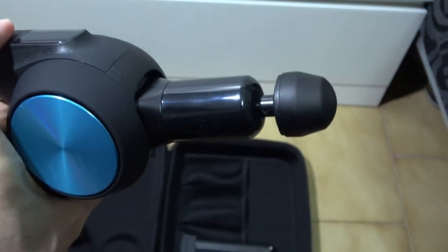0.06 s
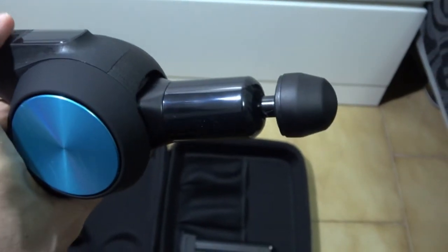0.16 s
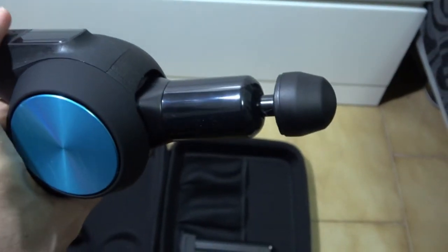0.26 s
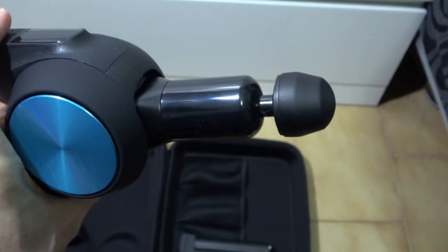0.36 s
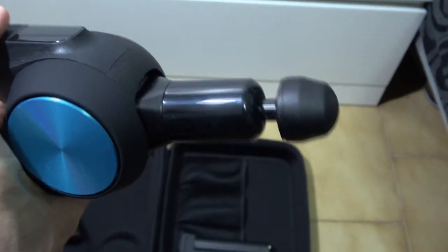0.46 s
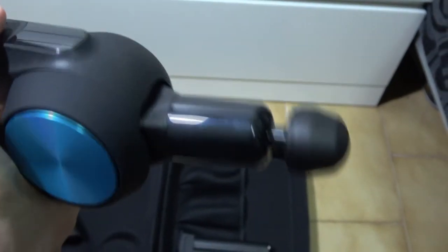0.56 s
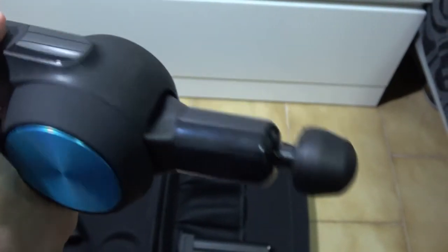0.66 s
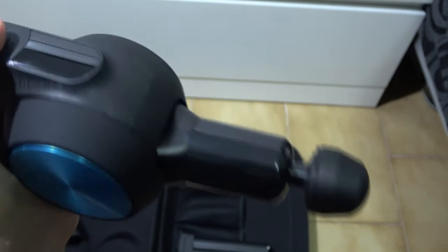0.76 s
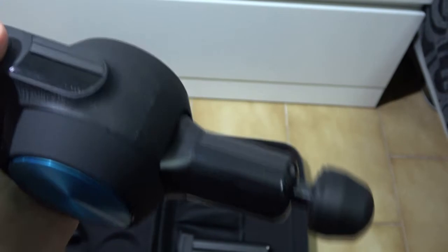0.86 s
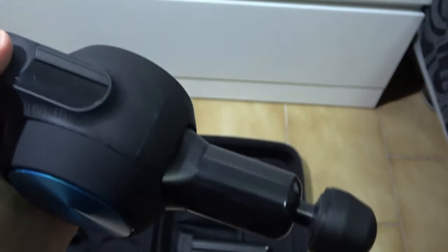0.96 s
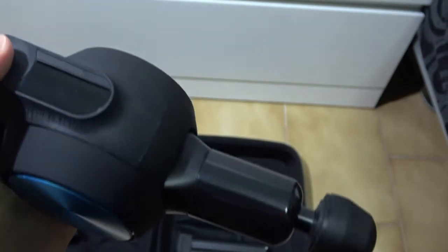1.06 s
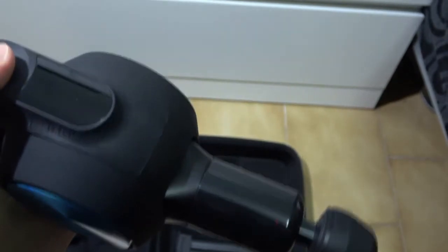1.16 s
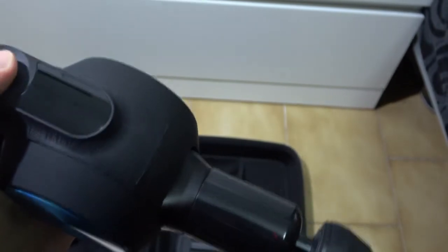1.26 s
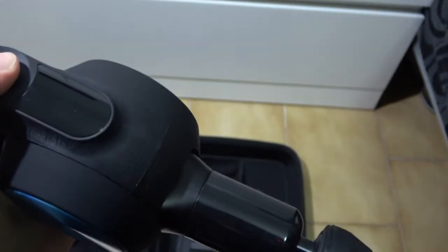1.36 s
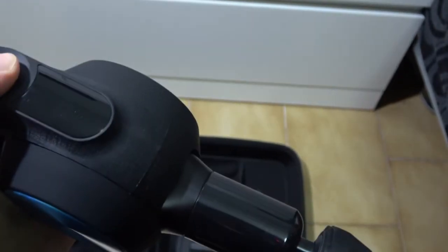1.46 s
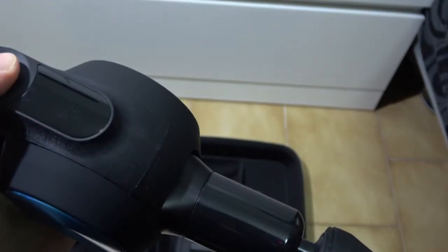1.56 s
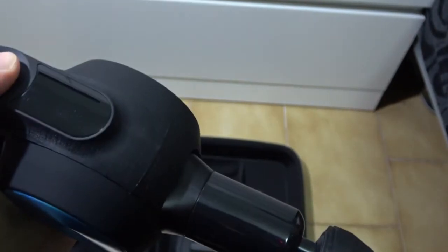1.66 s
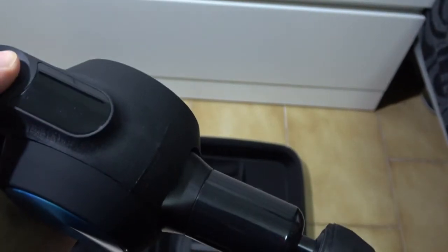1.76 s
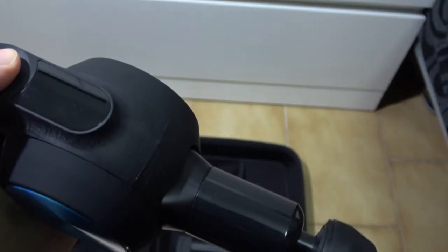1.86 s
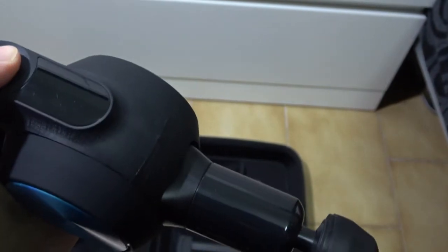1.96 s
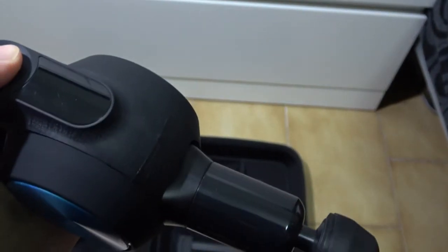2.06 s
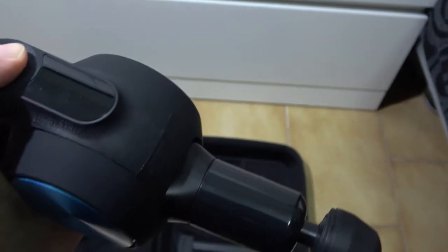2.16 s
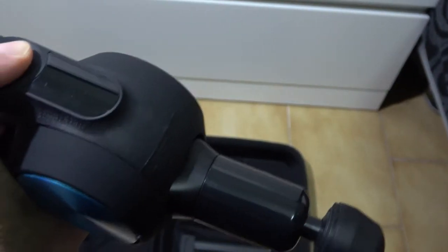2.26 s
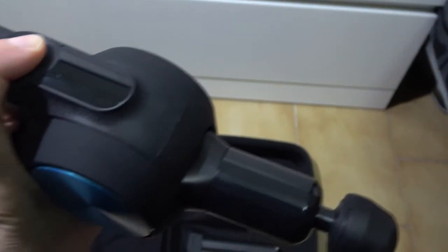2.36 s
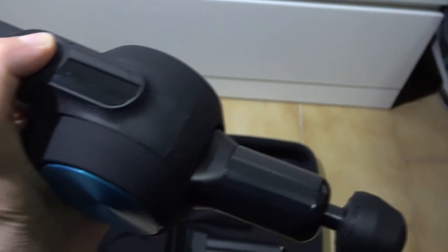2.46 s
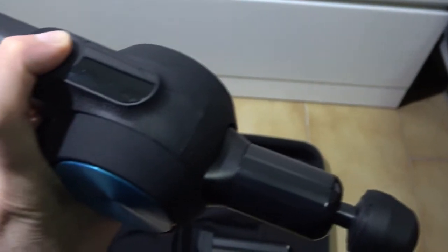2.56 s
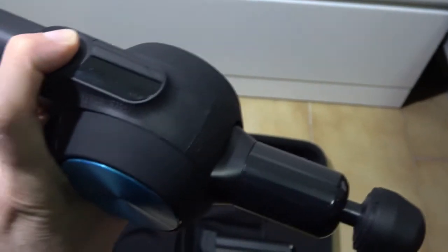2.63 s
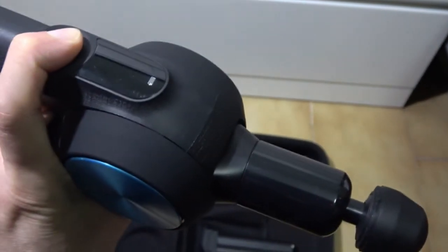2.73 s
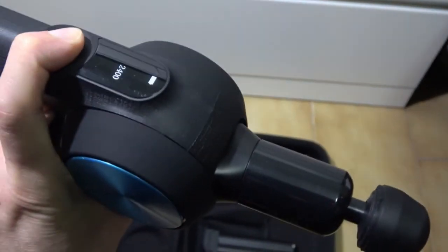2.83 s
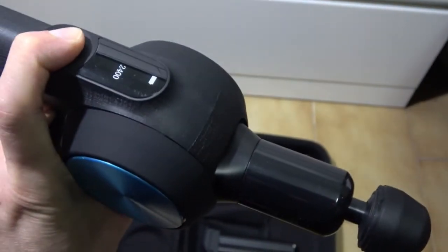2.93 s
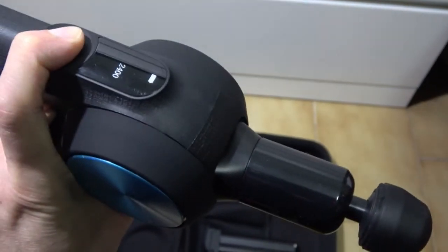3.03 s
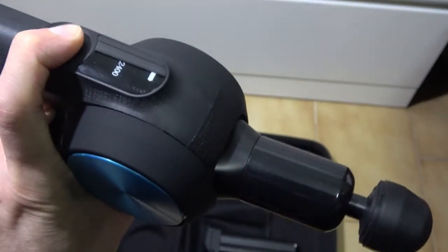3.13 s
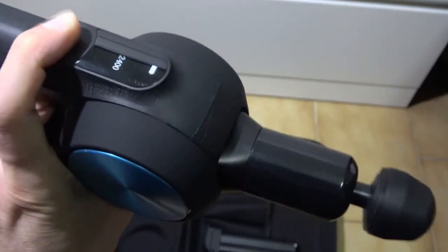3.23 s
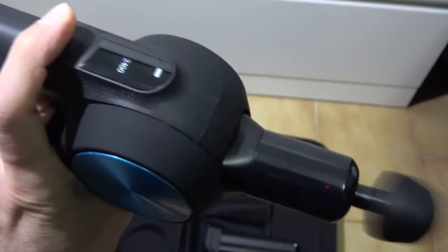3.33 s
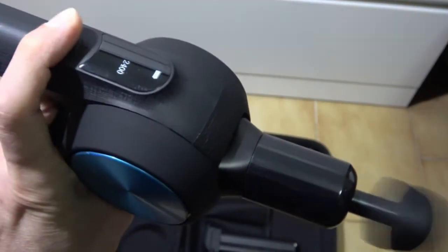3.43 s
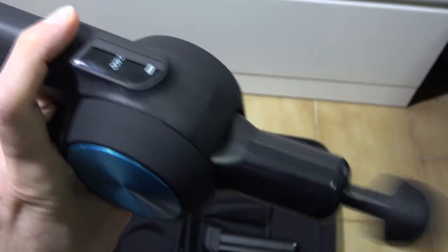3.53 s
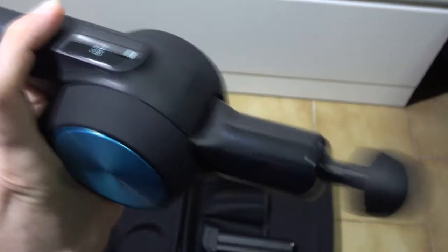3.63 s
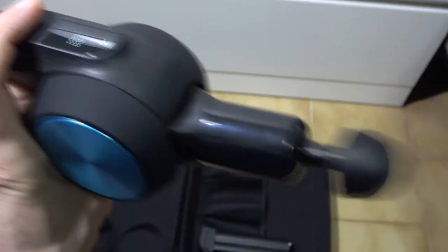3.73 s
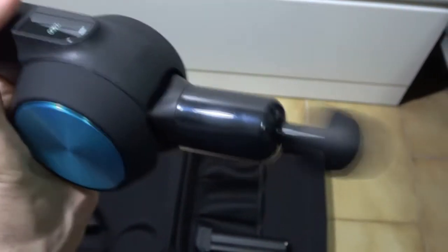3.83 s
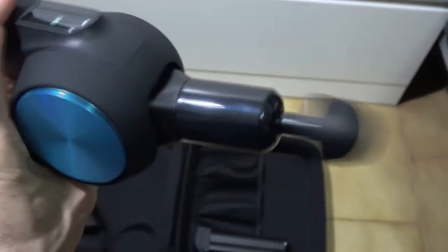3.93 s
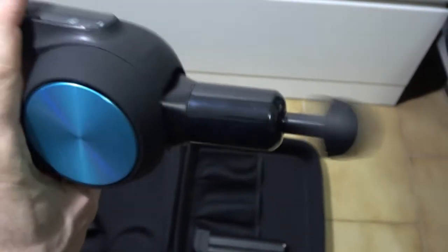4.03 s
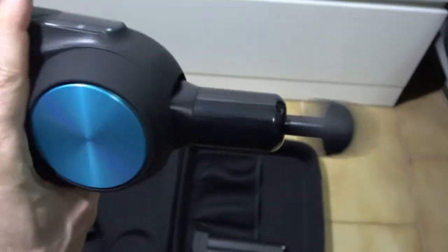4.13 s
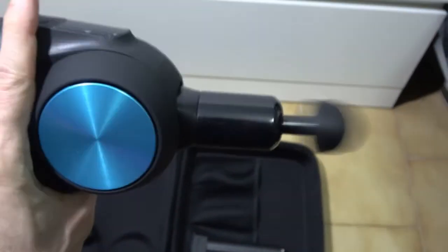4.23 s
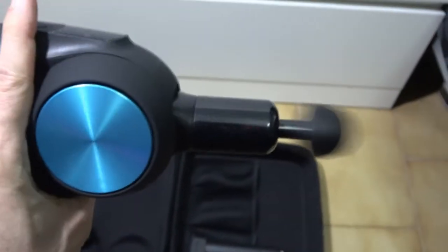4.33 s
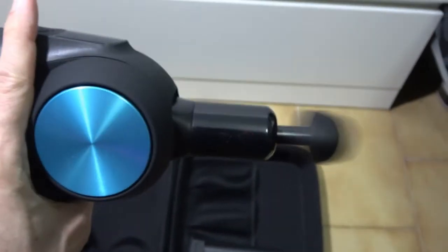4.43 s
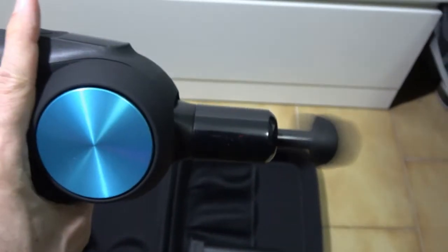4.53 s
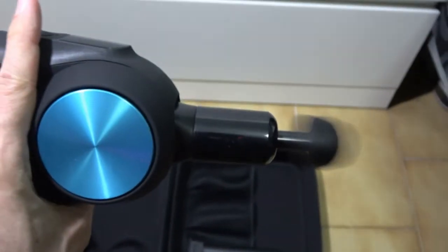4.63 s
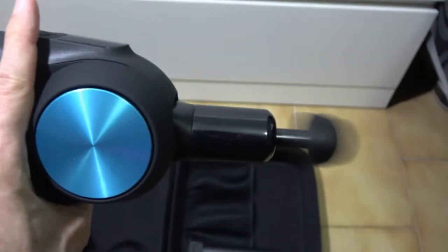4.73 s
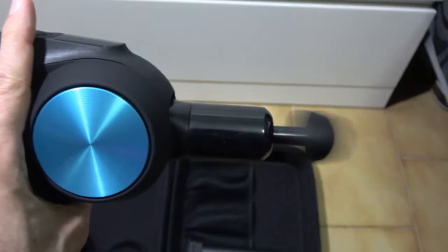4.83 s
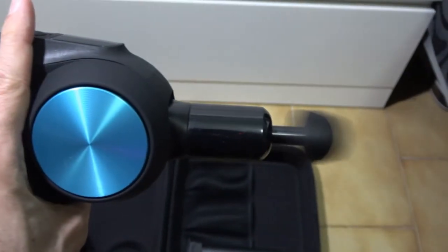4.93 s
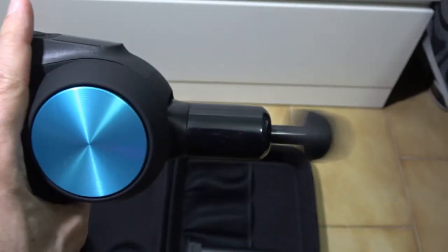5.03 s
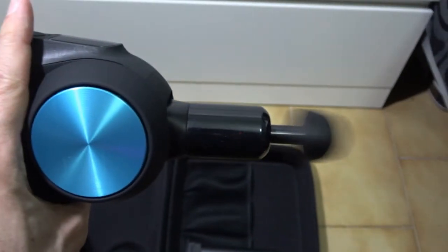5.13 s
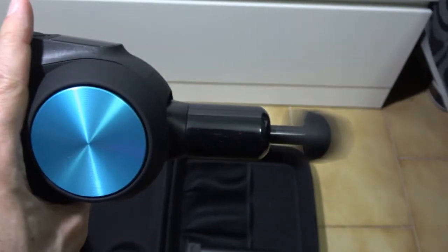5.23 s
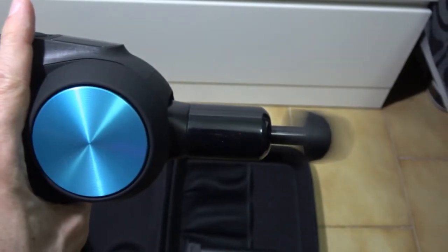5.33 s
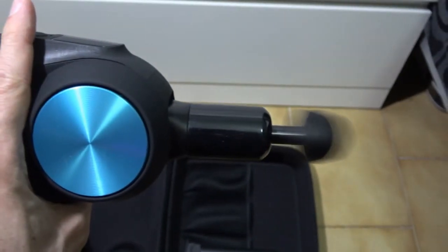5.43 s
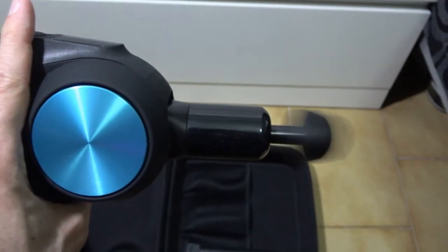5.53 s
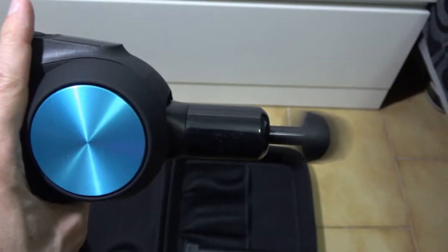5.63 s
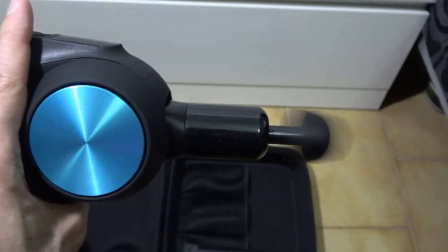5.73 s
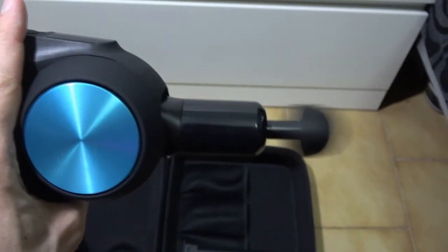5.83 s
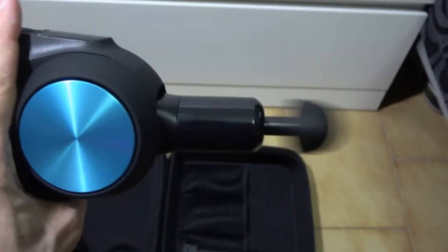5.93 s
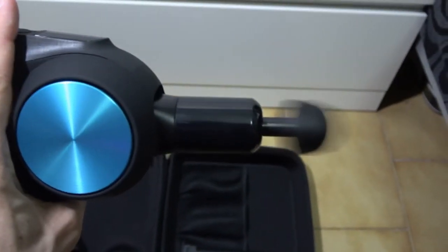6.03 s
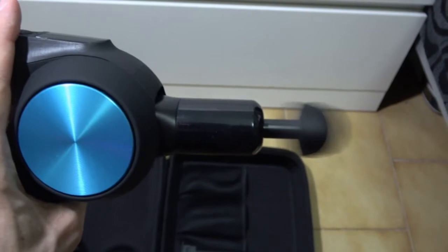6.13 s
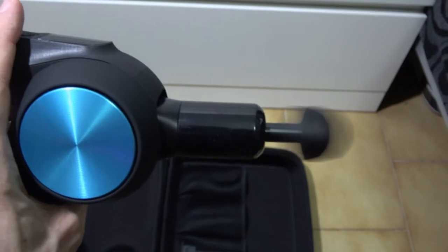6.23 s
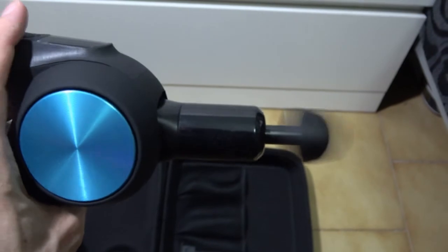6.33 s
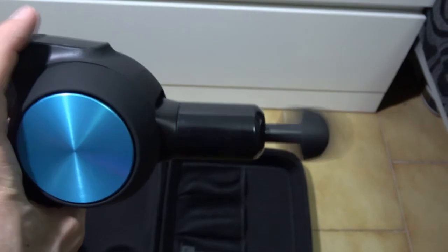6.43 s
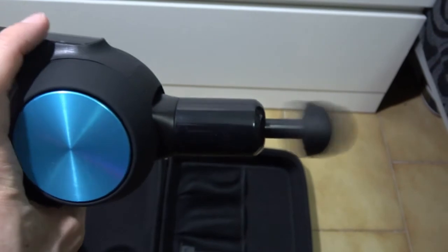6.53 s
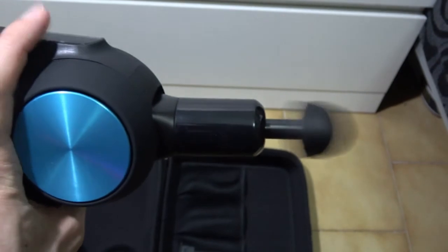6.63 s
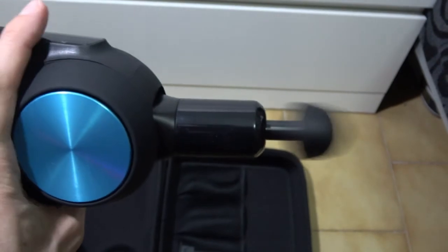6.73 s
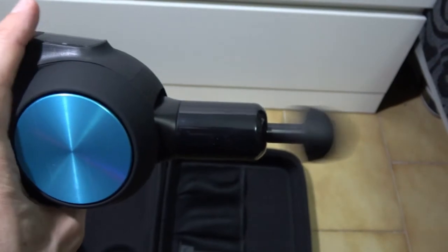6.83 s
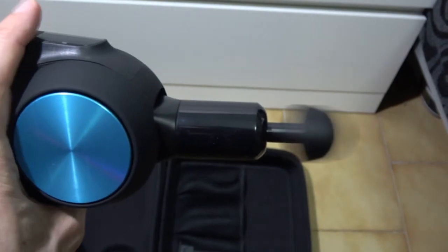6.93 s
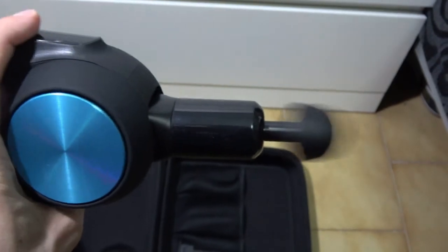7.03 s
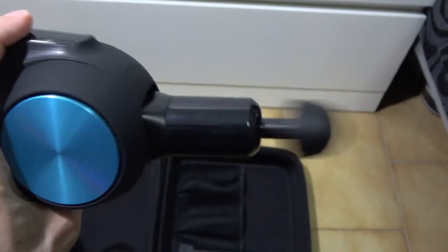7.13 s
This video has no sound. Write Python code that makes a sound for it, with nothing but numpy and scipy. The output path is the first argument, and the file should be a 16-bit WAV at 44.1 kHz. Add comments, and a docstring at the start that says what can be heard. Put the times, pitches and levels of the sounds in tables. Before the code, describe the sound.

A massage gun is handled close to the microphone, a little to the left, over the faint hum of a small tiled room. A soft scuff and small plastic snaps come first, then sharp button clicks. The motor starts and speeds up quickly, its piston knocking rapidly under a throbbing gear drone and a high whine. After holding briefly, it gradually speeds up again and keeps running.

```python
"""A faint fan-like hum in a small tiled room; then, close to the stereo microphone and left of centre,
a finger scuffs the shell of a massage gun, the casing snaps and its buttons click.
The motor kicks in and speeds up twice. Its piston linkage knocks with a falling pitch, its bearings
hiss, its overtones whine through the housing, and the gear mesh drones, swelling once a crank turn."""
import sys
import numpy as np
from scipy import signal
from scipy.fft import rfft, irfft, next_fast_len
from scipy.io import wavfile
from scipy.ndimage import uniform_filter1d, map_coordinates

SR = 44100
rng = np.random.default_rng(int(sys.argv[2]) if len(sys.argv) > 2 else 0)


def int16_out(signal):
    """Quantize to a 16-bit WAV file."""
    q = np.round(np.clip(np.atleast_2d(signal).T, -1, 1) * 32767)
    wavfile.write(sys.argv[1], SR, q.astype(np.int16))


N = 316638
TIME = np.arange(N) / SR
START_S, CRUISE_TURNS_PER_S = 3.33, 30   # the motor starts; the speed its levels refer to

# Table levels are relative: each part is scaled or filtered on its way to the microphone.
# room tone: (frequency [Hz], level [dB])
AIR_SPECTRUM = [(20, -18.5), (45, -5), (72, -15.5), (105, -6.5), (150, -8), (240, -14.5), (420, -9.5),
                (560, -11.5), (760, -7), (1000, -11), (1250, -13), (1700, -22), (4500, -35), (8000, -34),
                (15600, -39)]
# finger sliding on the shell: (time [s], level [dB])
SCUFF_LEVEL = [(.66, -92), (.725, -73), (.755, -50.5), (.768, -65), (.80, -85), (.86, -100)]
# its friction noise: (frequency [Hz], level [dB])
SCUFF_SPECTRUM = [(700, -7), (1500, -1), (2300, 2), (4000, -8.5), (8000, -10), (11000, -13), (16000, -29)]
# the casing gives under the grip: (time [s], level [dB])
CASING_SNAPS = [(1.131, -51), (1.212, -56), (1.2906, -33), (1.2917, -41), (1.2928, -42), (1.2952, -39),
                (2.461, -51)]
# buttons and the starting kick: (time [s], thud [dB], clack [dB], switch [dB])
CLICK_BLOWS = [(2.751, -47, -47, -30.5), (2.754, -28.5, -27, -25.5), (3.24, -64, -31, -47),
               (3.242, -69, -59, -49), (3.327, -32, -31, -33), (3.3304, -31, -41, -24),
               (3.3332, -28, -27, -23.5)]
# the piston's first slow strokes: (time [s], level [dB])
SLOW_STROKES = [(3.388, -30), (3.4637, -30), (3.5238, -28), (3.577, -36), (3.626, -33)]

# resonances of the gun: (frequency [Hz], width [Hz], level [dB])
CASING_MODES = [(1000, 220, 0), (1400, 240, 4), (2100, 400, -3.5), (2720, 360, -3.5), (3800, 800, -11.5),
                (6100, 2500, -12.5), (9150, 2500, -11.5), (12500, 1600, -15)]
BUTTON_MODES = [(1280, 275, 10), (2160, 160, -2), (2600, 600, -6.5), (3740, 1200, -6), (5600, 1250, 2),
                (6460, 1700, -1), (7530, 850, 1.5), (12700, 890, -15)]   # switches and the thin shell around them
SHELL_RING_MODES = [(960, 11, 3), (1050, 45, 1), (1455, 22, -8), (1730, 32, -20), (2420, 65, -10)]   # ring on after a blow
HEAVY_MODES = [(229.9, 12, 6), (264.2, 15, 5.5), (320, 47, -6), (379, 40, -6.5), (439.4, 17, 2),
               (506, 19, -2), (553, 38, 2), (648, 136, 8.5)]   # heavy parts thud
MIDWEIGHT_MODES = [(900, 148, 2.7), (1099, 47, -0.5), (1515, 330, -2.5), (1763, 170, 3.5),
                   (2620, 230, -10.5)]   # lighter parts clack
LIGHT_MODES = [(2200, 240, 4), (3020, 330, 7.5), (4430, 100, -1.5), (5670, 600, 3), (6460, 2700, -6.5),
               (8700, 820, -5), (12000, 970, -14)]   # the lightest tick
STEEL_MODES = [(8270, 960, -5), (8570, 320, 2), (11880, 270, -8), (12400, 500, -16)]   # bearing races
WHINE_MODES = [(978, 41, 14), (1450, 103, 12.5), (2446, 65, 3), (4305, 97, 8), (5250, 380, 8.5),
               (6290, 350, 12), (8500, 230, 9)]   # housing, swept by the overtones
BODY_MODES = [(492, 60, 4.5), (590, 110, -5), (834, 100, 0.5), (1490, 980, -16.5)]   # rung by the slow strokes

# the linkage crosses its play: (angle [turns], thud [dB], clack [dB])
LINKAGE_KNOCKS = [(.463, 1, 0.5), (.687, -9, -11.5), (.938, -14, -12)]
# light ticks of the joints: (angle [turns], level [dB])
JOINT_TICKS = [(.235, -2), (.36, 4), (.465, 3), (.555, -1), (.655, -3.5), (.775, -1.5), (.895, -3),
               (.965, -1)]
# the cushioned linkage passes little treble: (frequency [Hz], gain [dB])
CUSHION_GAIN = [(2500, -0.5), (5000, -5), (10000, -22)]
# bearing noise: (frequency [Hz], level [dB])
BEARING_SPECTRUM = [(120, -15.5), (190, 7.5), (300, 4.5), (450, 6.5), (800, 14.5), (1250, 4), (1800, 2.5),
                    (2800, -8.5), (3700, -11), (5500, -9.5), (7500, -9), (8500, -9.5), (9600, -22.5),
                    (11000, -27), (12000, -9), (13500, -20.5), (16000, -25)]
# ringing of the races: (time [s], level [dB])
RACE_LEVEL = [(3.33, -43), (3.55, -50), (3.72, -49.5), (4.15, -56), (4.45, -63), (5.3, -58), (5.9, -55.5),
              (6.4, -54.5), (7.18, -55)]
# tooth-rate harmonics, from the second up: (level [dB], extra at full strain [dB])
WHINE_HARMONICS = [(-66.5, 9.5), (-58.5, 6.5), (-65, -1), (-72, -6), (-65.5, 2), (-74.5, -9), (-72.5, -12),
                   (-57, -3.5), (-68, -1), (-72.5, 0), (-77, 16.5), (-80, 17), (-83, 6), (-79, 8), (-82, 1),
                   (-78, 3)]
# single harmonics swell or dip: (time [s], half length [s], harmonic [number], gain [dB])
HARMONIC_SWELLS = [(3.41, 0.024, 3, 7.5), (3.47, 0.043, 3, -6), (3.537, 0.015, 3, 2.5),
                   (3.655, .03, 4, 20.5), (3.97, 0.18, 6, 8.5), (4.124, .21, 11, 14), (4.048, .15, 17, 19),
                   (4.4, 0.27, 3, -13), (4.5, 0.13, 6, 4.5), (4.9, .88, 9, 4.5), (5.048, .35, 6, -5),
                   (6.05, .13, 6, 0), (6.35, 0.15, 6, 2), (6.59, 0.11, 6, -9), (6.4, 0.25, 10, 7),
                   (6.85, 0.71, 3, -4), (3.98, 0.18, 3, 4.5), (3.997, .1, 2, 4.5), (4.45, .2, 2, 5.5),
                   (5.145, .5, 3, 3.5), (5.87, .1, 9, -5), (7.052, 0.22, 9, -5)]
# gear drone: (time [s], level [dB])
DRONE_LEVEL = [(3.6, -43.5), (3.7, -40), (3.88, -38), (4.02, -34), (4.12, -36), (4.35, -33.5), (4.9, -37.5),
               (5.5, -35.5), (5.8, -41), (6.1, -39.5), (6.25, -38.5), (6.41, -40.5), (6.57, -34.5),
               (6.75, -36.5), (6.87, -33.5), (7.18, -38)]
# how long the tooth load builds before the top of the push: (time [s], rise [turns])
PUSH_BUILD = [(5.45, 0.34), (5.8, 0.15), (6.05, .14), (6.3, 0.2), (6.6, .32)]
# load on the return stroke against the push: (time [s], level [dB])
RETURN_LEVEL = [(4.0, 4.5), (4.3, -4.5), (4.95, -17), (5.45, -13), (5.9, -12), (6.26, -11), (6.6, 11.5),
                (7.18, 1.7)]
# shaft whistle: (time [s], level [dB])
WHISTLE_LEVEL = [(4.1, -75), (4.6, -64), (5.4, -62), (6.3, -64), (7.18, -70)]
# at a crawl the linkage is too slow to shake the whole gun: (frequency [Hz], gain [dB])
CRAWL_GAIN = [(200, -7.5), (350, -5.5), (500, -1)]
# the gun at the microphone: (frequency [Hz], left minus right [dB])
MIC_BALANCE = [(100, -3.5), (280, 5), (450, 0), (700, 5), (1400, 5), (3000, 1.5), (8000, 3), (13000, -0.2)]


def from_db(db):
    """Decibels to gain."""
    return 10 ** (np.asarray(db) / 20)


def rms_one(x):
    """Scale to rms 1."""
    return x / np.sqrt(np.mean(x ** 2) + 1e-20)


def running_one(x):
    """Scale to rms 1 over the time the motor runs."""
    return x / np.sqrt(np.mean(x[TIME > START_S] ** 2) + 1e-20)


def in_time(rows):
    """A curve through (time, value) points."""
    return np.interp(TIME, *np.transpose(rows))


def colour(x, points):
    """Filter by a spectrum of (frequency [Hz], gain [dB]) points."""
    hz, db = np.transpose(points)
    size = 2 * next_fast_len(N // 2 + 1)
    bins = np.maximum(np.fft.rfftfreq(size, 1 / SR), 1)
    gain = from_db(np.interp(np.log(bins), np.log(hz), db))
    return irfft(rfft(x, size) * gain, size)[..., :N]


def drift(rate_hz):
    """A smooth random wander of rms 1."""
    knots = rng.standard_normal(4000)
    curve = map_coordinates(knots, [TIME[::20] * rate_hz], order=3, mode="wrap")
    return rms_one(curve).repeat(20)[:N]


def resonate(x, modes):
    """Parallel resonances of alternating sign."""
    out = 0
    for k, (hz, width, db) in enumerate(modes):
        r = np.exp(-np.pi * width / SR)
        poles = [1, -2 * r * np.cos(2 * np.pi * hz / SR), r * r]
        ring = (1 - r * r) / 2 * signal.lfilter([1, 0, -1], poles, x + 1e-18)
        out = out + (-1) ** k * from_db(db) * ring
    return out


def strike(times, sizes, modes):
    """Blows ring the modes; a blow of size 1 peaks near 1."""
    at = np.clip(times * SR, 0, N - 2)
    whole, part = at.astype(int), at % 1
    blows = np.bincount(whole, sizes * (1 - part), N) + np.bincount(whole + 1, sizes * part, N)
    peak = np.abs(resonate(signal.unit_impulse(SR // 20), modes)).max()
    return resonate(blows, modes) / peak


def room_tone(air_db=-60.5, hum_hz=916, hum_db=-66, side_db=-16, left_db=2.3):
    """Steady air noise and a wavering hum in the background, a little left of the microphone."""
    mid, side = rms_one(colour(rng.standard_normal((2, N)), AIR_SPECTRUM))
    air = from_db(air_db) * (mid + from_db(side_db) * side * [[1], [-1]])
    hum_level = np.sqrt(2) * from_db(hum_db + 2 * drift(10))
    hum = hum_level * np.sin(2 * np.pi * (hum_hz * TIME + .12 * drift(6.8)))
    return np.array([colour(channel, [(40, sign * .86), (400, sign * left_db)])
                     for channel, sign in zip(air + hum, (1, -1))])


def finger_scuff(grain_db=3):
    """Skin sticks and slides on plastic."""
    friction = rng.standard_normal(N) * from_db(grain_db * drift(500))
    return from_db(in_time(SCUFF_LEVEL)) * rms_one(colour(friction, SCUFF_SPECTRUM))


def casing_snaps():
    """The casing gives under the grip with small, dry snaps."""
    times, db = np.transpose(CASING_SNAPS)
    return strike(times, from_db(db), CASING_MODES)


def clicks(trim_db=-5.5, ring_db=-11, chatter_db=-9, chatter_s=.002):
    """Buttons snap and the motor kicks: short blows that rebound and leave the shell ringing."""
    times, thud_db, clack_db, switch_db = np.transpose(CLICK_BLOWS)
    low_cut = signal.butter(2, 560, "high", fs=SR, output="sos")   # too light to move the whole gun
    thud = signal.sosfilt(low_cut, strike(times, from_db(thud_db), HEAVY_MODES[6:]))
    clack = strike(times, from_db(clack_db + trim_db), MIDWEIGHT_MODES)
    shell = strike(times, from_db(clack_db + ring_db), SHELL_RING_MODES)
    switch = strike(times, from_db(switch_db + trim_db), BUTTON_MODES)
    lateness = rng.exponential(1, (len(times), 6))   # six rebounds a blow, the later the softer
    rebounds = times[:, None] + chatter_s * lateness
    sizes = from_db(switch_db[:, None] + chatter_db - lateness) * rng.choice([-1, 1], lateness.shape)
    chatter = strike(rebounds.ravel(), sizes.ravel(), BUTTON_MODES)
    return thud + clack + shell + switch + chatter


def rotor_ring(hz=935, width_hz=13, peak_db=-31.5):
    """The rotor rings as it is kicked into motion."""
    return strike(np.array([START_S]), from_db(peak_db), [(hz, width_hz, 0)])


def crank_speed(kick_turns_per_s=8.35, surge_s=.25, settle_s=.57, step_up_s=5.46):
    """Turns per second: the crank jumps, surges, settles on its first speed, then climbs steadily."""
    since = np.maximum(TIME - START_S, 0)
    surge = 17.28 * (1 - np.exp(-(since / surge_s) ** 1.44))
    settle = 4 * (1 - np.exp(-since / settle_s))
    climb = 2.91 * np.maximum(TIME - step_up_s, 0)
    return kick_turns_per_s + surge + settle + climb


def effort_gain(speed, strain, cruise_db, doubling_db, strain_db):
    """A part grows louder with each doubling of speed; strain raises or lowers it."""
    return from_db(cruise_db + doubling_db * np.log2(speed / CRUISE_TURNS_PER_S) + strain_db * strain)


def contacts(turns, speed, joint_angles, joint_db, modes, uneven_db, jitter_s=.00002):
    """Each joint crosses its play at the same angle of every turn, never quite alike."""
    angles = (np.arange(int(turns[-1]) + 1)[:, None] + joint_angles).ravel()
    chance = np.clip(rng.standard_normal((1500, 2)), -1.7, 1.7)[:len(angles)]
    times = np.interp(angles, turns, TIME) + jitter_s * chance[:, 0]
    sizes = from_db(np.resize(joint_db, len(angles)) + uneven_db * chance[:, 1])
    firmness = np.interp(times, TIME, np.minimum(speed / CRUISE_TURNS_PER_S, 1))
    return running_one(strike(times, sizes * (angles < turns[-1]) * firmness, modes))


def bend(x, delay_at_1khz_ms=3.97):
    """Bending waves cross the body highs first, so each knock falls in pitch."""
    size = next_fast_len(N + SR)
    khz = np.fft.rfftfreq(size, 1 / SR) / 1000
    phase = 4 * np.pi * delay_at_1khz_ms * np.sqrt(khz)
    return irfft(rfft(x, size) * np.exp(-1j * phase), size)[:N]


def linkage(turns, speed, strain):
    """The piston linkage thuds and clacks through its cushion while its joints tick."""
    angles, thud_db, clack_db = np.transpose(LINKAGE_KNOCKS)
    thud = contacts(turns, speed, angles, thud_db, HEAVY_MODES, uneven_db=1)
    thud *= effort_gain(speed, strain, cruise_db=-43, doubling_db=12.5, strain_db=-1.5)
    clack = contacts(turns, speed, angles, clack_db, MIDWEIGHT_MODES, uneven_db=.9)
    clack *= effort_gain(speed, strain, cruise_db=-48, doubling_db=16, strain_db=1.5)
    ticks = contacts(turns, speed, *np.transpose(JOINT_TICKS), LIGHT_MODES, uneven_db=1.6, jitter_s=4e-5)
    tick_gain = effort_gain(speed, strain, cruise_db=-53, doubling_db=18, strain_db=-14.5)
    return colour(bend(thud + clack), CUSHION_GAIN) + tick_gain * bend(ticks)


def bearing_hiss(turns, speed, strain, fresh_db=-2.5, throb_db=1.7):
    """Worn surfaces repeat their roughness each turn under fresh, brighter hiss."""
    surface = rng.standard_normal(2048)
    worn = rms_one(np.interp(turns % 1 * len(surface), np.arange(len(surface)), surface))
    fresh = from_db(fresh_db) * colour(rng.standard_normal(N), [(600, -4.5), (2000, 4.5)])
    throb = from_db(throb_db * np.cos(2 * np.pi * (turns - .58)))   # louder on the loaded half turn
    hiss = running_one(colour((worn + fresh) * throb * (TIME > START_S), BEARING_SPECTRUM))
    return hiss * effort_gain(speed, strain, cruise_db=-43, doubling_db=6.5, strain_db=4.5)


def bearing_races(turns, fresh_db=-7):
    """Balls roll over the same marks each turn: a comb of partials glides through the ringing steel."""
    marks = rng.standard_normal(1100)
    rolling = map_coordinates(marks, [turns % 1 * len(marks)], order=3, mode="wrap")
    rolling += from_db(fresh_db) * rng.standard_normal(N)
    return from_db(in_time(RACE_LEVEL)) * running_one(resonate(rolling, STEEL_MODES))


def whine(turns, speed, strain, sway_turns=.00091, shake_turns=.00023, flutter_db=1.5, dull_db=.5):
    """Tooth-rate overtones flare as they cross the housing's modes; at a crawl they lurch and dull."""
    slowness = CRUISE_TURNS_PER_S / speed
    sway = sway_turns * np.sin(4 * np.pi * turns)   # the piston's inertia, twice a turn
    mesh = TEETH * (turns + slowness ** 2 * (sway + shake_turns * drift(70)))
    overtones = 0
    for k, (db, strain_db) in enumerate(WHINE_HARMONICS, 2):
        swell = sum(gain_db * np.exp(-((TIME - time) / length) ** 2)
                    for time, length, harmonic, gain_db in HARMONIC_SWELLS if harmonic == k)
        dulling = dull_db * (k - 2) * np.log2(slowness)
        level = db + swell + strain_db * strain - dulling + flutter_db * drift(40)
        overtones = overtones + from_db(level) * np.sin(2 * np.pi * (k * mesh + rng.random()))
    overtones = np.sqrt(2) * overtones * (TIME > START_S)
    return overtones + resonate(overtones, WHINE_MODES)


def first_strokes():
    """The piston's first slow strokes reach the microphone one by one, as dull knocks."""
    times, db = np.transpose(SLOW_STROKES)
    return strike(times, from_db(db), BODY_MODES)


def hump(turns, top, rise, fall):
    """A smooth bump of height 1, once a turn; top, rise and fall are in turns."""
    past = (turns - top + .5) % 1 - .5
    return np.exp(-(past / np.where(past < 0, rise, fall)) ** 2)


def gear_drone(turns, speed, idle_db=-18.5, flutter_db=.44, release_at=.669, release_turns=.189):
    """The mesh tone follows the tooth load; the teeth lag, and the pitch sags as the load lets go."""
    push = hump(turns, top=.6513, rise=in_time(PUSH_BUILD), fall=.046)
    pull = from_db(in_time(RETURN_LEVEL)) * hump(turns, top=.083, rise=.17, fall=.29)
    load = (from_db(idle_db) + push + pull) * from_db(flutter_db * drift(60))
    load /= np.sqrt(uniform_filter1d(load ** 2, SR // 7))
    since_release = (turns - release_at) % 1
    release = np.minimum(since_release / release_turns, 1)
    stroke = np.maximum(since_release - release_turns, 0) / (1 - release_turns)
    stroke_lag = np.interp(speed, [29.4, 31.5], [.059, .54])   # turns per second to cycles of lag
    lag = (2 - stroke_lag) * release + stroke_lag * stroke   # two cycles are lost in every turn
    engaged = np.clip((speed - 17) / 7, 0, 1)   # the mesh only sings once it is up to speed
    level = np.sqrt(2) * from_db(in_time(DRONE_LEVEL) + .3) * engaged
    return level * load * np.sin(2 * np.pi * (TEETH * turns - lag))


def shaft_whistle(turns, cycles_per_turn=195, flutter_db=3):
    """A thin whistle between the gear's overtones, locked to the shaft."""
    level = np.sqrt(2) * from_db(in_time(WHISTLE_LEVEL) + flutter_db * drift(30))
    return level * np.sin(2 * np.pi * (cycles_per_turn * turns + .1 * drift(80)))


def motor(onset_s=.0024, full_strain_turns_per_s2=19):
    """All moving parts follow the crank angle; strain is the torque spent on speeding up."""
    speed = crank_speed()
    turns = np.cumsum(speed * (TIME > START_S)) / SR
    strain = np.clip(np.gradient(speed) * SR / full_strain_turns_per_s2, 0, 1)
    parts = gear_drone(turns, speed) + linkage(turns, speed, strain)
    parts += bearing_hiss(turns, speed, strain) + bearing_races(turns)
    parts += whine(turns, speed, strain) + shaft_whistle(turns)
    running = np.clip((TIME - START_S) / onset_s, 0, 1)
    shaking = np.clip((speed - 20) / 8, 0, 1)   # the bass fills in as the whole gun shakes
    return running * (shaking * parts + (1 - shaking) * colour(parts, CRAWL_GAIN))


def tiled_room(x, t60_s=.23, gap_s=.004, side_db=-7):
    """A short, dense tail off tiles and furniture, nearly alike on both sides of the microphone."""
    t = TIME[:SR // 2]
    mid, side = rng.standard_normal((2, len(t))) * from_db(-60 * t / t60_s) * (t > gap_s)
    band = signal.butter(2, [700, 12000], "band", fs=SR, output="sos")
    tail = signal.sosfilt(band, mid + from_db(side_db) * side * [[1], [-1]])
    return signal.fftconvolve(x[None], tail / np.sqrt(np.sum(mid ** 2)), axes=1)[:, :N]


def scene(motor_send_db=-10.5, handling_send_db=-7.5):
    """The gun is held close to the microphone, left of centre, with the room behind it."""
    drive = motor()
    handling = finger_scuff() + casing_snaps() + clicks() + rotor_ring() + first_strokes()
    direct = np.array([colour(drive + handling, [(hz, sign * db / 2) for hz, db in MIC_BALANCE])
                       for sign in (1, -1)])
    reflected = tiled_room(from_db(motor_send_db) * drive + from_db(handling_send_db) * handling)
    return direct + reflected + room_tone()


def record(dry, cutoff_hz=15750):
    """A steep high cut on the microphone signal."""
    return signal.sosfilt(signal.ellip(10, .1, 80, cutoff_hz, fs=SR, output="sos"), dry)


TEETH = 26   # mesh cycles per crank turn

dry = scene()
out = record(dry)
int16_out(out)
```